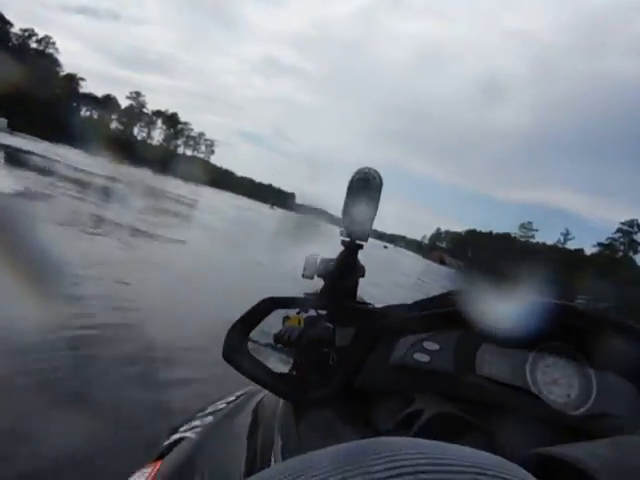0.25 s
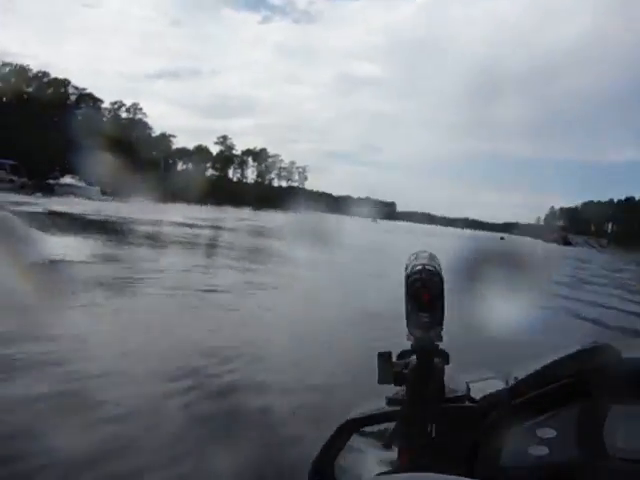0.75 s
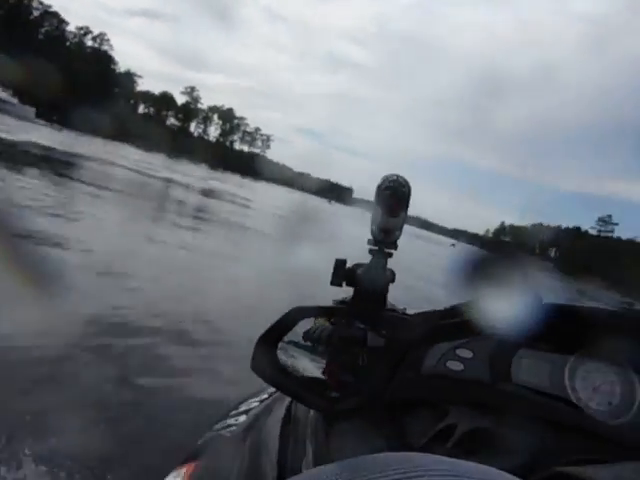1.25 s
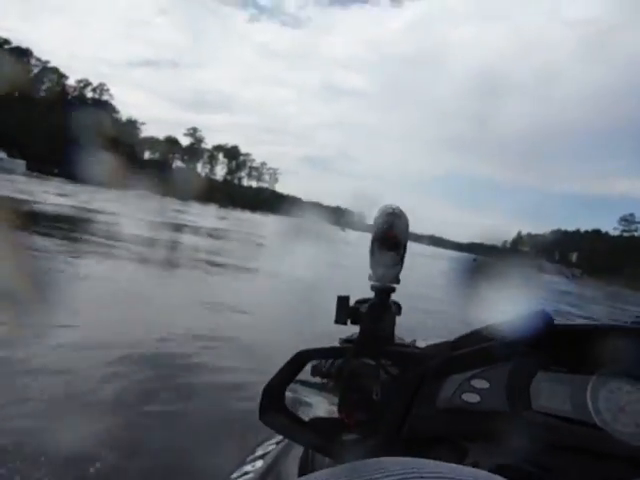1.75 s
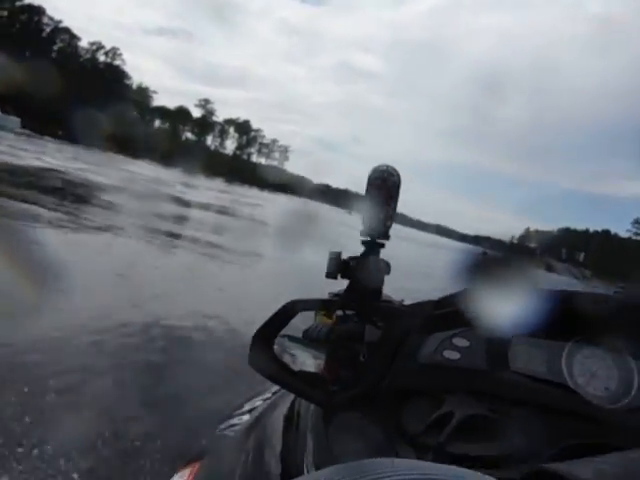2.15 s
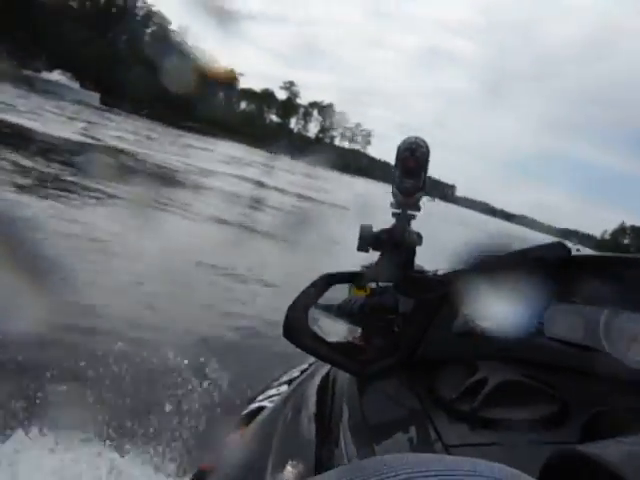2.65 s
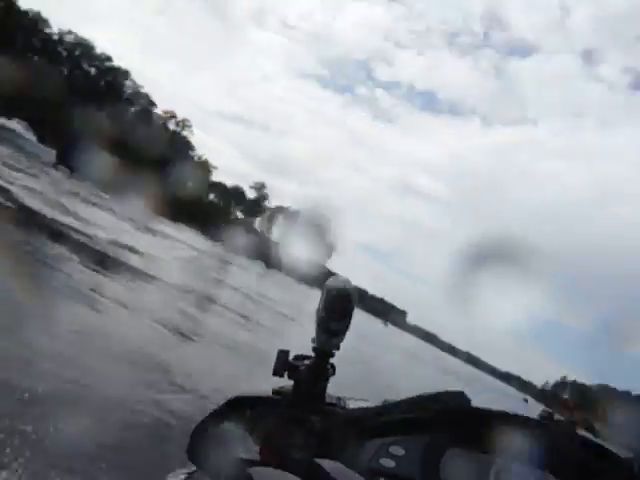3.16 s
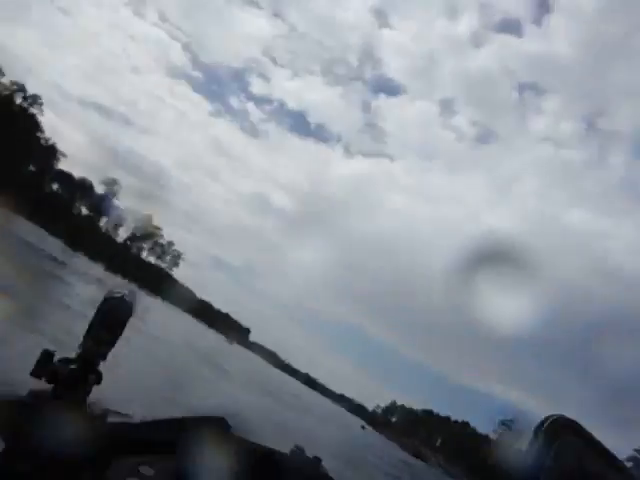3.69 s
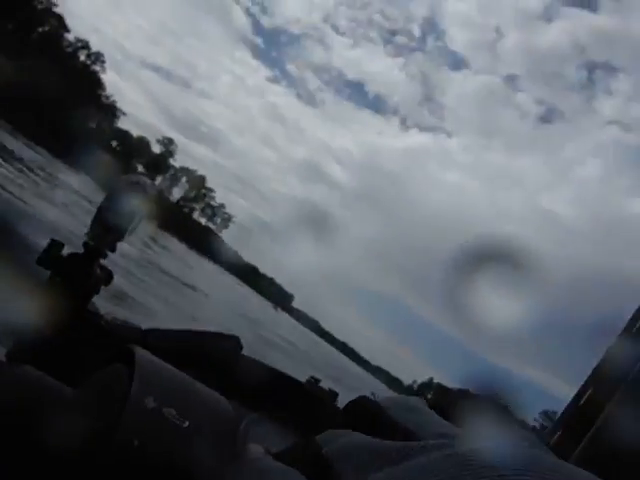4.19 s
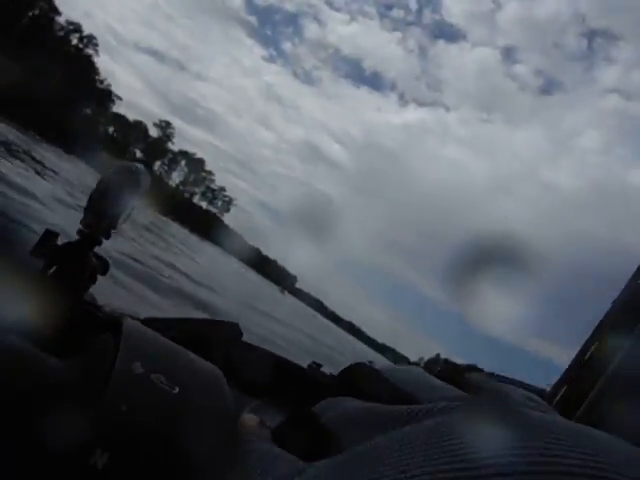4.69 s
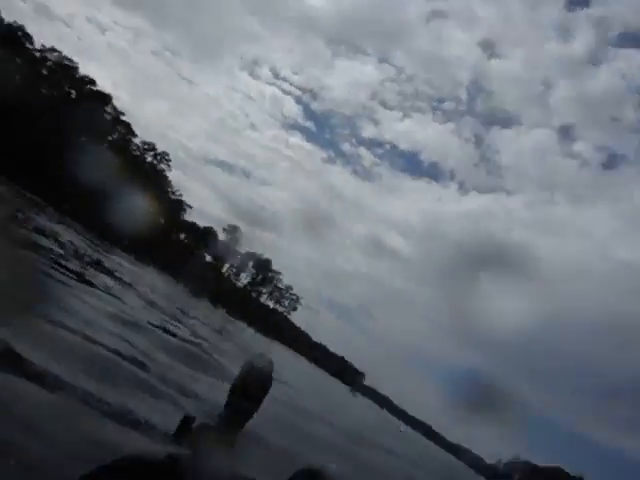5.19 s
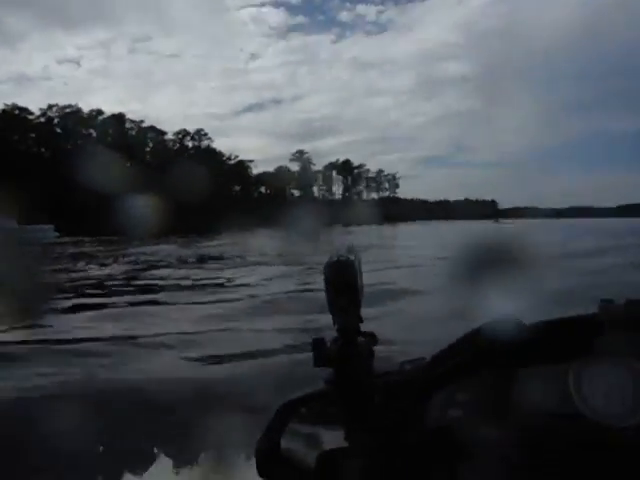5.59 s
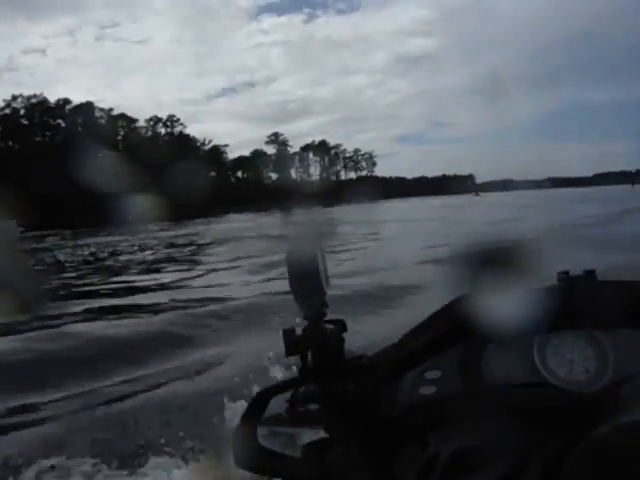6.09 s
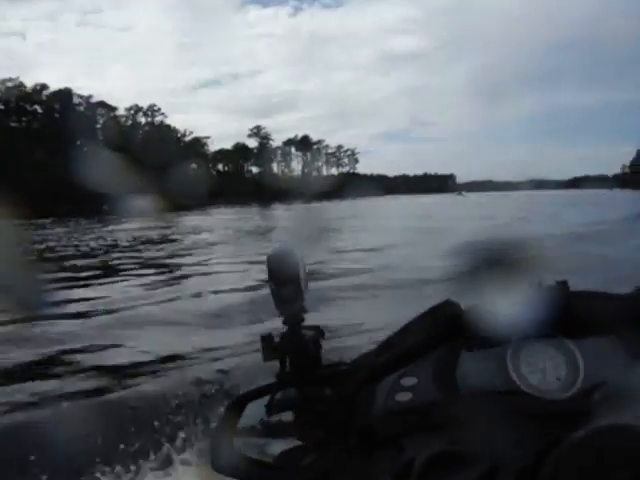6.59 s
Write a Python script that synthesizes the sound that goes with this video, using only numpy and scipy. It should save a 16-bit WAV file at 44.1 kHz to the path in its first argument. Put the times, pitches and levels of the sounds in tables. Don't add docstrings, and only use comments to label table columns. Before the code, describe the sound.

Two small watercraft engines drone harshly and beat together over rushing, hissing water; the throttle drops near the end and the near note falls.

```python
import sys
import numpy as np
from scipy import signal
from scipy.io import wavfile
from scipy.ndimage import uniform_filter1d

SR = 44100
rng = np.random.default_rng(int(sys.argv[2]) if len(sys.argv) > 2 else 0)


def rack_gain(trim_db):
    fader = np.asarray(trim_db, float)
    return 10 ** (fader / 20)


def dump(signal):
    limited = np.clip(np.atleast_2d(signal).T, -1, 1)
    pcm = np.round(limited * 32767).astype(np.int16)
    wavfile.write(sys.argv[1], SR, pcm)


N = 301957

# (time [s], level [dB])
SPRAY_LEVEL = [(0, -32), (.3, -31), (1.2, -30), (1.35, -32), (2.0, -33.5), (2.4, -36), (3.15, -36),
               (3.64, -37.5), (5.05, -38), (5.64, -44), (5.8, -39), (5.97, -45), (6.2, -43.5), (6.26, -40),
               (6.32, -44), (6.65, -45.5), (6.8, -50), (6.86, -44)]


def evened(x):
    return x / np.sqrt(np.mean(x ** 2) + 1e-20)


def along(rows):
    s, *columns = np.transpose(rows)
    return [np.interp(np.arange(N) / SR, s, column) for column in columns]


def waver(count):
    t = np.arange(0, N + 256, 256) / SR
    hz = np.geomspace(.5, 6, 16)[:, None]
    start_turns = rng.random((count, 16, 1))
    slow = np.sin(2 * np.pi * (hz * t + start_turns)).sum(axis=1)
    return [np.interp(np.arange(N) / SR, t, evened(drift)) for drift in slow]


def tone(turns, order, db, place):
    return rack_gain(db) * np.cos(2 * np.pi * (order * turns + place))


def engines():
    # (time [s], speed [Hz])
    own_speed = [(0.0, 111.27), (0.2, 107.25), (0.6, 110.61), (0.85, 105.01), (1.1, 104.95), (1.4, 96.78),
                 (2.5, 95.57), (2.7, 102.72), (3.1, 93.71), (3.75, 96.53), (4.3, 93.41), (4.55, 94.88),
                 (4.95, 88.78), (5.35, 91.76), (5.75, 56.58), (5.9, 47.39), (6.5, 41.95), (6.86, 43.64)]
    # (time [s], speed [Hz])
    other_speed = [(0.0, 103.8), (0.45, 104.89), (1.0, 104.08), (3.15, 103.55), (3.9, 104.13),
                   (4.3, 103.29), (5.05, 103.87), (5.8, 103.29), (6.86, 98.43)]
    # (time [s], level [dB])
    own_swell = [(0, .1), (.4, -.5), (.7, 1.5), (.85, -4), (1.0, -14), (1.2, -7), (1.3, 2.5), (1.38, -1),
                 (2.4, 1), (2.75, -.5), (3.1, 1.5), (3.7, 3.5), (4.5, 3), (5.0, 2), (5.35, 2.5), (5.85, -3),
                 (6.35, 2), (6.86, -10)]
    # (time [s], level [dB])
    other_near = [(0, -10), (.2, -5), (.7, -2), (1.1, -4.5), (1.3, -11), (1.4, -4.5), (2.5, -3),
                  (2.68, -7.5), (2.83, .1), (3.0, -4), (4.0, -3.5), (4.9, -5.5), (5.25, -3), (5.55, -5.5),
                  (5.78, -1.5), (5.9, -4), (6.5, -7.5), (6.86, -9.5)]
    # (open throttle [dB], shut throttle [dB], share of the swell and sag [0-1])
    own_orders = [(0.1, -10, .99), (-8.5, -2, .5), (-4, -10, .7)]
    # (frequency [Hz], level [dB], lead [turns])
    hull = [(45, -19, 0), (88, -2, 0), (103, 2.5, 0), (130, -5, 0), (178, -1.5, -.03), (192, -11, .15),
            (215, -8.5, .64), (330, -20.5, 1.2)]
    firing_turns = (.163, .430, .406, .765)
    waver_db = (.4, 1.2, 2.5, .6)
    # (order [per turn], level [dB], place [turns])
    own_faint = [(.5, -40, .71), (1.5, -26.5, .11), (2.5, -30.5, .6), (4, -33.5, .47), (5, -34, .39),
                 (6, -43, .1)]
    # (order [per turn], level against its drone [dB], place [turns])
    other_faint = [(1.5, -26.5, .46), (2, -18.5, .94), (3, -23, .99), (4, -24, .27)]

    own_hz, other_hz = along(own_speed)[0], along(other_speed)[0]
    swell_db, near_db = along(own_swell)[0], along(other_near)[0]
    own_turns, other_turns = np.cumsum(own_hz) / SR, np.cumsum(other_hz) / SR
    lift_s, lift_takes_s = 5.4, .2
    shut = np.clip((np.arange(N) / SR - lift_s) / lift_takes_s, 0, 1)
    drift_db = [db * drift for db, drift in zip(waver_db, waver(count=4))]

    other_db = near_db + drift_db[3]
    sound = tone(other_turns, 1, other_db, firing_turns[3])
    hull_hz, hull_db, hull_lead = np.transpose(hull)
    for k, (open_db, shut_db, swell_share) in enumerate(own_orders):
        order = k + 1
        db = open_db + shut * (shut_db - open_db) + swell_share * swell_db + drift_db[k]
        log_hz = np.log(order * own_hz)
        passed_db = np.interp(log_hz, np.log(hull_hz), hull_db)
        lead = np.interp(log_hz, np.log(hull_hz), hull_lead)
        sound += tone(own_turns, order, db + passed_db, firing_turns[k] + lead)
    for order, db, place in own_faint:
        sound += tone(own_turns, order, db, place)
    for order, db, place in other_faint:
        sound += tone(other_turns, order, other_db + db, place)
    return sound


def noise(points, patchy_db, flicker_db, size):
    frames, hz = 4 * N // size + 5, np.fft.rfftfreq(size, 1 / SR)
    real, imaginary, patches = rng.standard_normal((frames, len(hz), 3)).T
    patches = uniform_filter1d(patches, size=8, axis=0)
    patches = evened(uniform_filter1d(patches, size=10, axis=1))
    flicker = evened(uniform_filter1d(rng.standard_normal(frames), size=3))
    point_hz, point_db = np.transpose(points)
    colour_db = np.interp(np.log(hz + 1), np.log(point_hz), point_db, left=-60, right=-70)[:, None]
    level_db = colour_db + patchy_db * patches + flicker_db * flicker
    spectra = (real + 1j * imaginary) * rack_gain(level_db)
    return evened(signal.istft(spectra, nperseg=size, noverlap=size - size // 4)[1][:N])


def water():
    # (frequency [Hz], level per Hz [dB])
    wash_colour = [(15, 0.5), (40, 7.5), (80, 6), (200, 6), (450, -9.5), (800, -20), (1600, -38)]
    rush_colour = [(200, -6.5), (450, 1), (1000, -5.5), (1900, -7), (2600, -13.5), (3300, -25), (5000, -29),
                   (8000, -35)]
    spray_colour = [(2000, -8), (3500, -8), (5000, -7.5), (5900, -2.5), (6800, 2.5), (7800, -5.5),
                    (9800, -9.5), (12000, -24), (17000, -33)]
    # (time [s], length [s], thud [dB], rush [dB])
    slaps = [(.0, .08, 8, .1), (.21, .08, 12, .1), (.35, .06, 8, 1.5), (.47, .07, 10, 7.5),
             (.67, .06, 8, .1), (1.1, .25, 5, 1.5), (1.38, .06, 10, .1), (1.51, .05, 10, 4),
             (1.78, .06, 6, .1), (2.12, .1, 7, -1.5), (2.3, .05, .1, 3), (2.4, .05, 3, 6),
             (2.56, .05, 8, .1), (2.72, .15, 7, 2), (3.12, .05, .1, 1.5), (5.64, .15, 3, .1),
             (6.3, .25, 5, .1), (6.82, .06, 3, 3)]

    t = np.arange(N) / SR
    spray_db = along(SPRAY_LEVEL)[0]
    wash_db = -31 + .4 * (spray_db + 37)
    rush_db = -27.5 + .45 * (spray_db + 37)
    for s, length, slap_thud_db, slap_rush_db in slaps:
        swell = np.maximum(1 - abs(t - s) / length, 0)
        wash_db += swell * slap_thud_db
        rush_db += swell * slap_rush_db
    wash = rack_gain(wash_db + 7.5) * noise(wash_colour, patchy_db=1.5, flicker_db=2.5, size=2048)
    rush = rack_gain(rush_db + 4.5) * noise(rush_colour, patchy_db=1.0, flicker_db=0.76, size=512)
    spray = rack_gain(spray_db + 3.5) * noise(spray_colour, patchy_db=0.7, flicker_db=1.5, size=256)
    return wash + rush + spray


def drops():
    # (time [s], peak [dB], share of dull smack [0-1], share of thin snap [0-1])
    hits = [(0.3640, -18.5, .2, .1), (0.5830, -19, .2, .1), (0.9281, -9, .15, .6), (1.1097, -6, .2, .3),
            (1.3908, -4, .9, .15), (1.644, -18, .1, .9), (1.7540, -12, .7, .02), (1.92, -16, .1, .7),
            (2.6897, -18, .2, .1), (3.4155, -12, .35, .03), (3.6645, -12, .35, .03), (4.4507, -21, .3, .1),
            (4.9550, -15, .4, .03), (6.0702, -9, .9, .3), (6.2550, -21, .3, .01), (6.2621, -16, .4, .01),
            (6.2700, -20, .3, .01), (6.380, -20, .9, .01), (6.4886, -24, .3, .05), (6.6555, -26, .15, .1),
            (6.6641, 2, .6, .04), (6.6941, -5, .9, .02), (6.7280, -21, .3, .04), (6.7310, -23, .3, .04)]
    # (frequency [Hz], time to fall 60 dB [s])
    housing = [(3600, .0035), (4800, .003), (6500, .004), (9400, .003), (13500, .0017)]

    t, out = np.arange(900) / SR, np.zeros(N)
    rise = 1 - np.exp(-t / .0003)
    rings = [rise * rack_gain(-60 * t / t60) * np.sin(2 * np.pi * hz * t) for hz, t60 in housing]
    smack, over, port, upper, snap = rings

    spatter = .09 * rng.standard_normal((len(hits), 60)) * np.exp(-np.arange(60) / 25.)
    spatter[:, 12] = 1
    for (s, db, dull, thin), grains in zip(hits, spatter):
        ring = dull * (.7 * smack - over) + port - .25 * upper + thin * snap
        hit = np.convolve(grains, ring)
        part = out[round(s * SR):][:len(hit)]
        part += rack_gain(db) * hit[:len(part)] / abs(hit).max()

    mist_per_s = 110.
    mist = rack_gain(4.5 * np.minimum(rng.exponential(1, N), 5)) * (rng.random(N) < mist_per_s / SR)
    mist *= rack_gain(1.4 * (along(SPRAY_LEVEL)[0] + 33) - 45)
    mist_ring = .6 * port + 1.1 * snap + .3 * smack + .6 * upper
    return out + signal.oaconvolve(mist, mist_ring)[:N]


def scene():
    return (engines() + water() + drops())[None]


def roll_off(x):
    return signal.sosfilt(signal.butter(12, 17380, fs=SR, output="sos"), x)


def record(dry):
    ceiling = (-.9, .845)
    limit = np.where(dry > 0, ceiling[1], -ceiling[0])
    knee = 9.3
    flat = dry / (1 + abs(dry / limit) ** knee) ** (1 / knee)
    pole = np.exp(-2 * np.pi * 3. / SR)
    tilted = signal.lfilter([1, -1], [1, -pole], flat)
    return roll_off(tilted)


dry = scene()
out = record(dry)
dump(out)
```